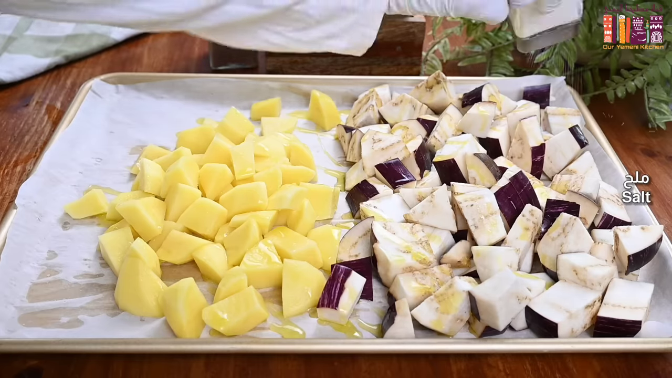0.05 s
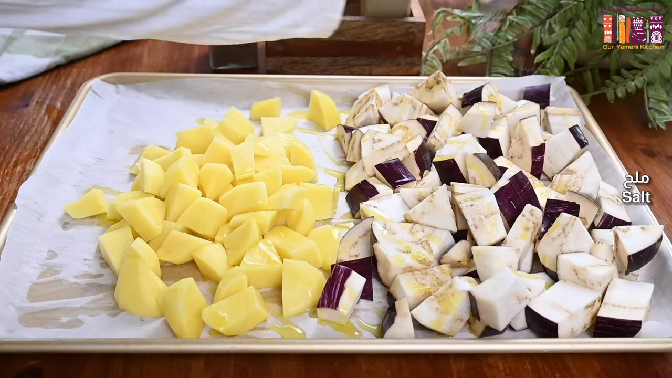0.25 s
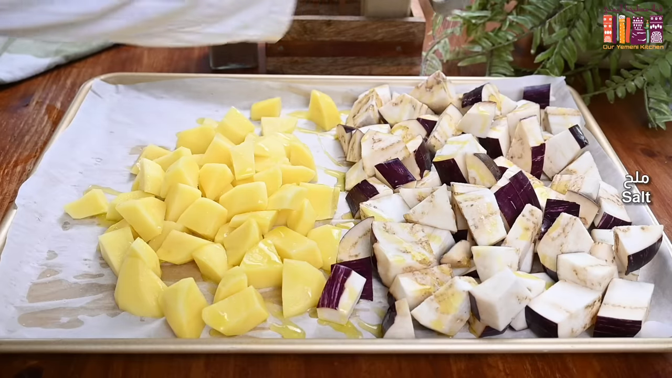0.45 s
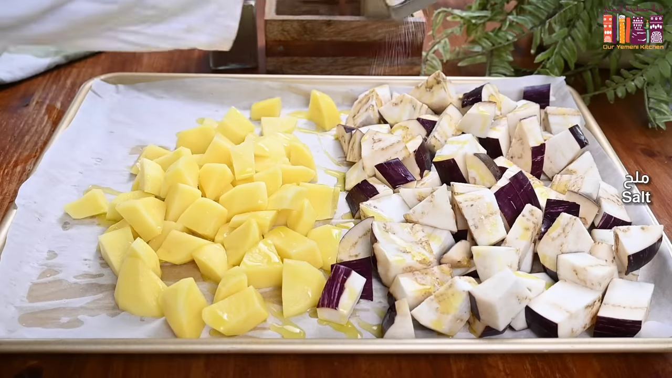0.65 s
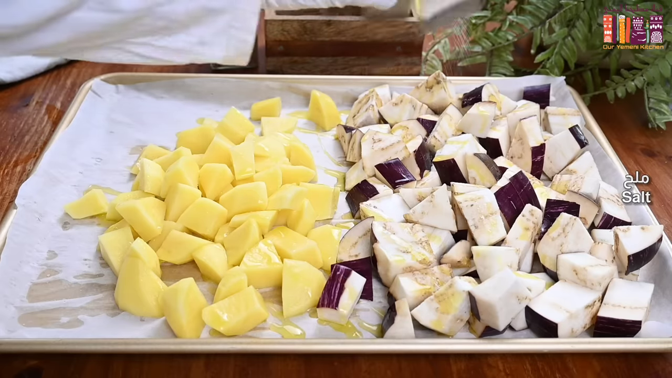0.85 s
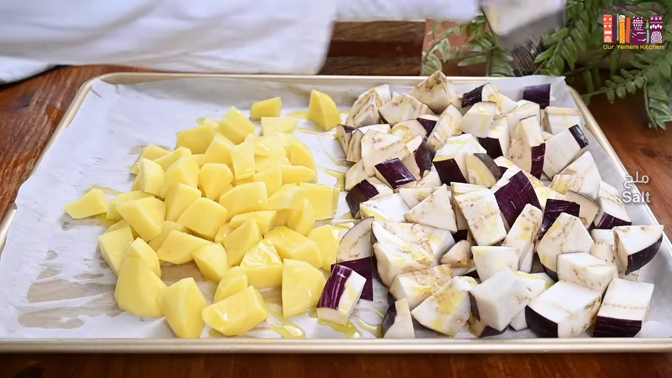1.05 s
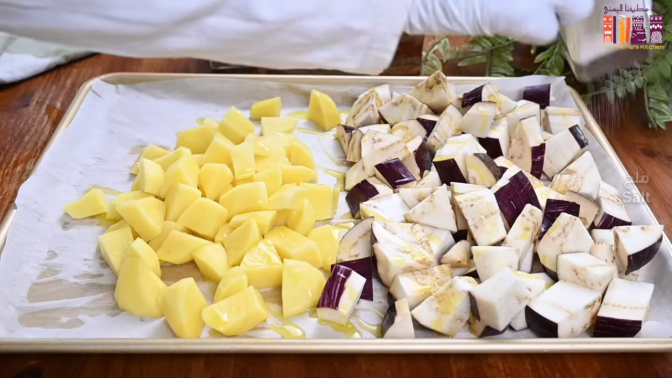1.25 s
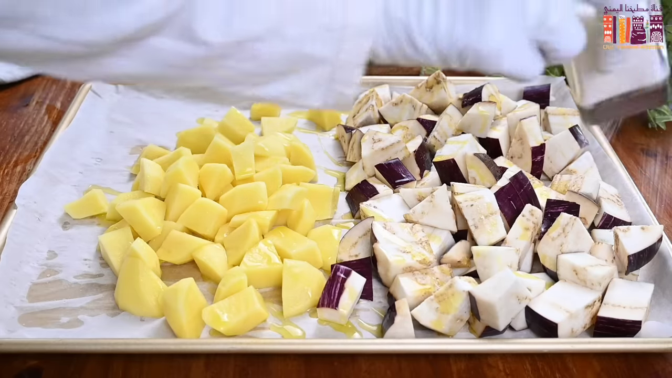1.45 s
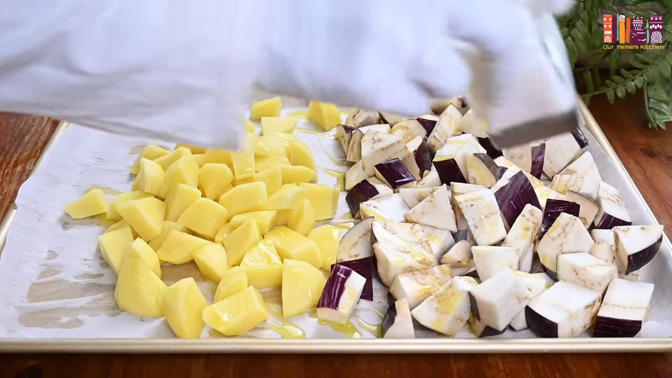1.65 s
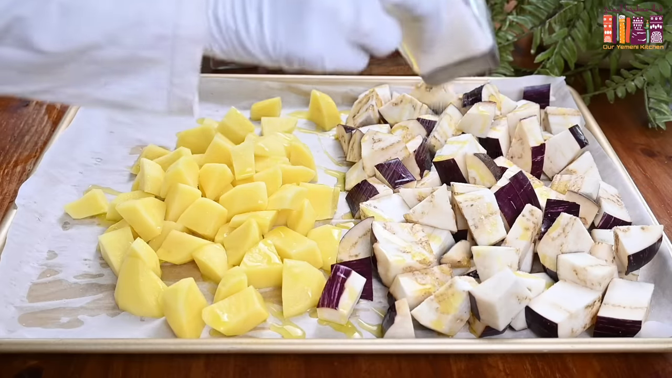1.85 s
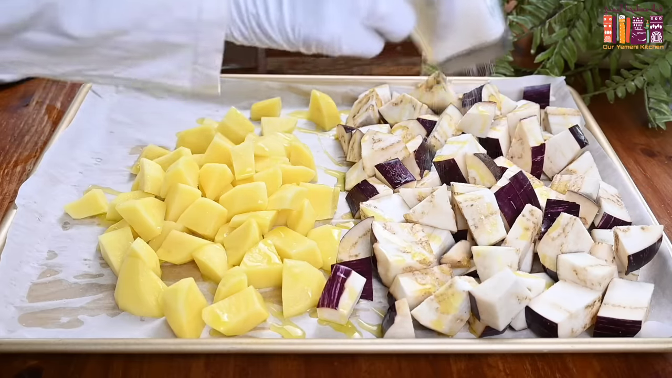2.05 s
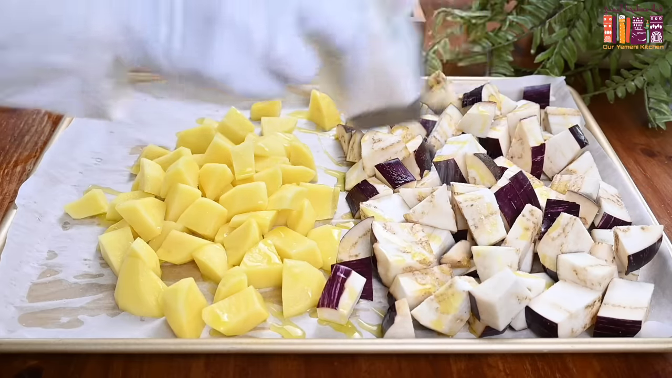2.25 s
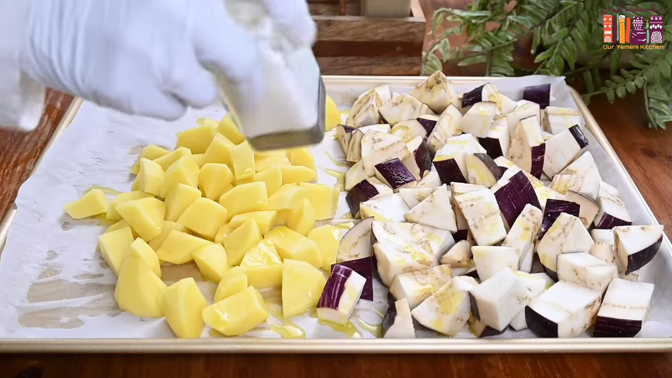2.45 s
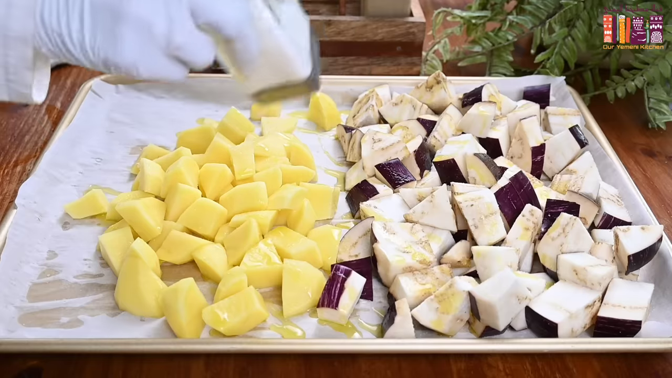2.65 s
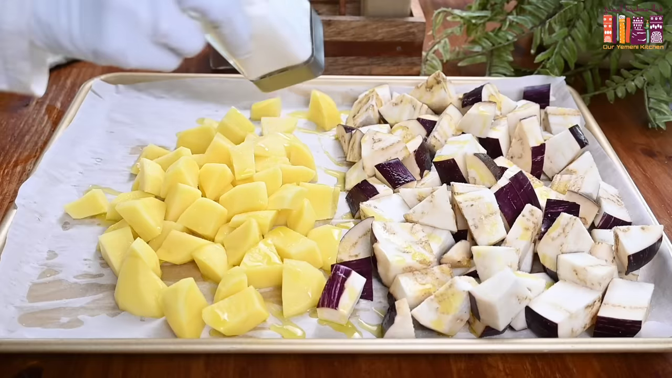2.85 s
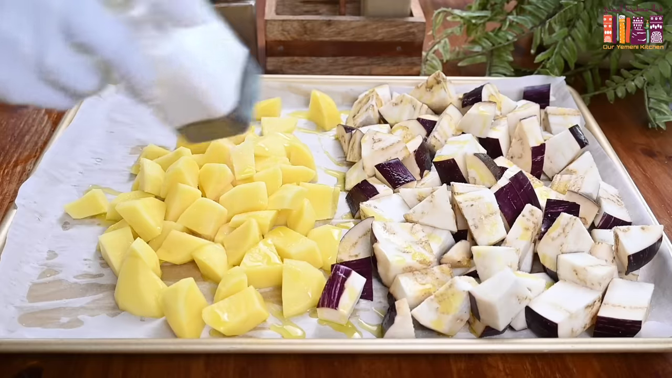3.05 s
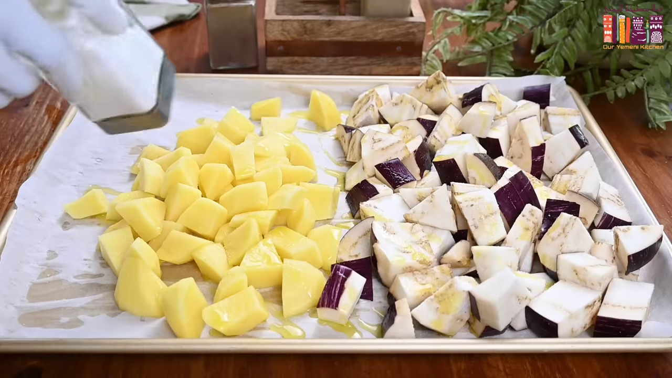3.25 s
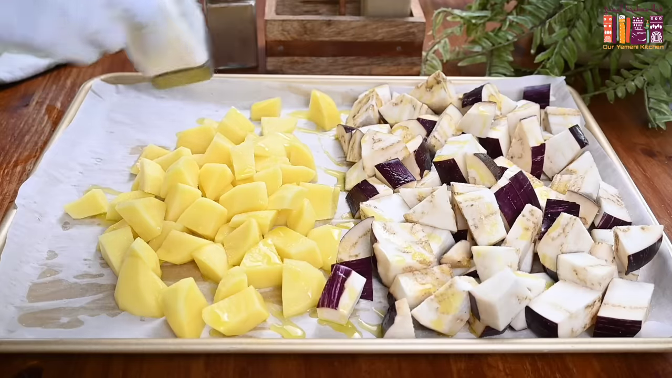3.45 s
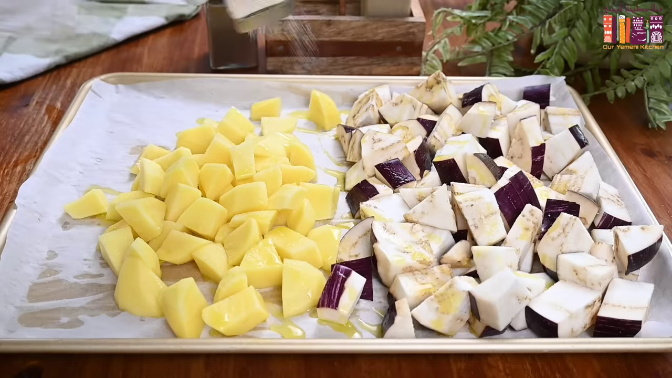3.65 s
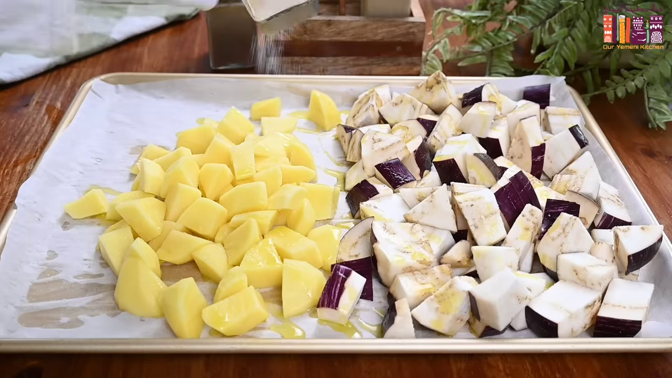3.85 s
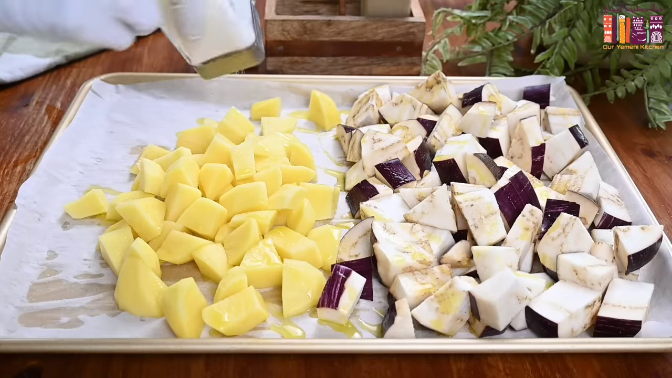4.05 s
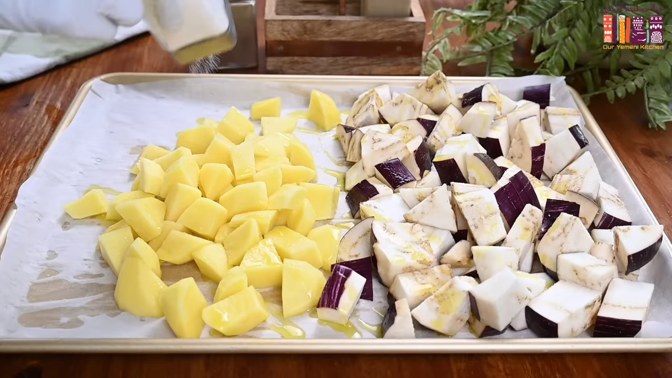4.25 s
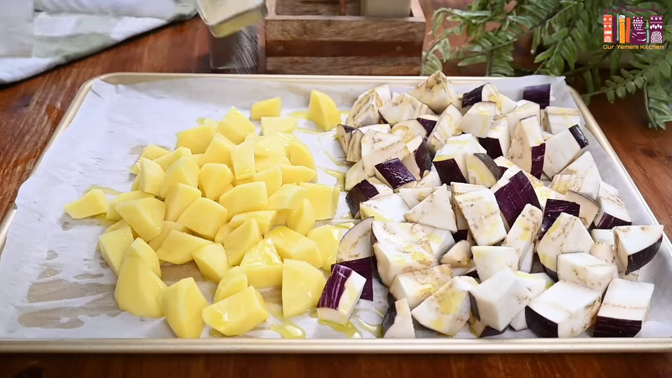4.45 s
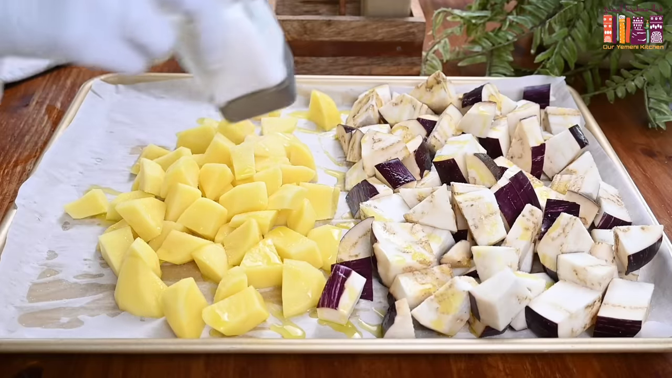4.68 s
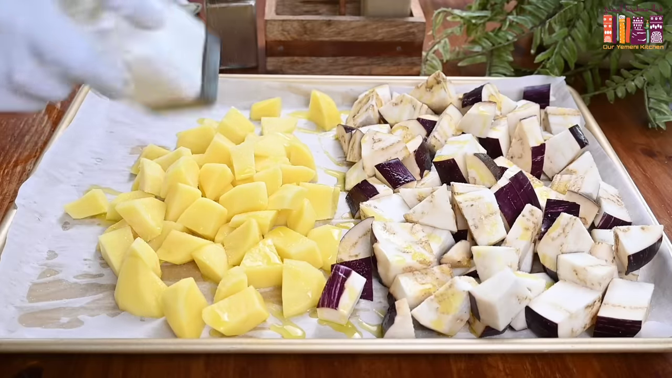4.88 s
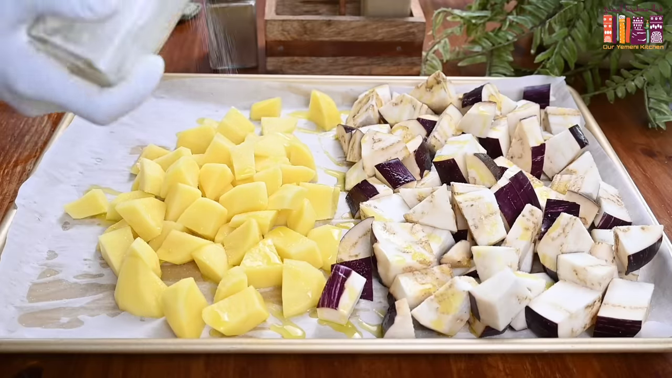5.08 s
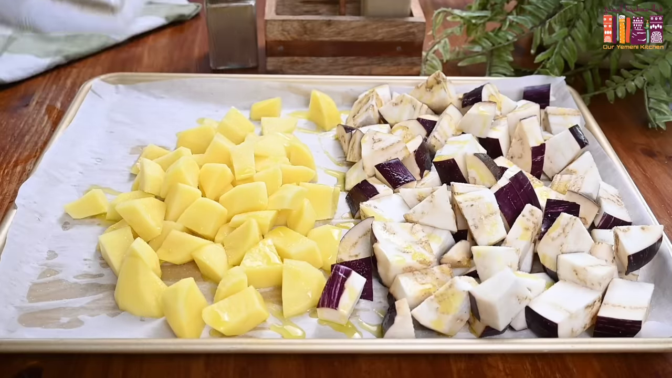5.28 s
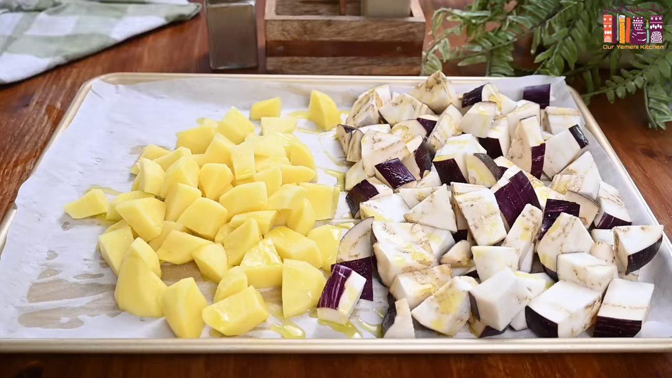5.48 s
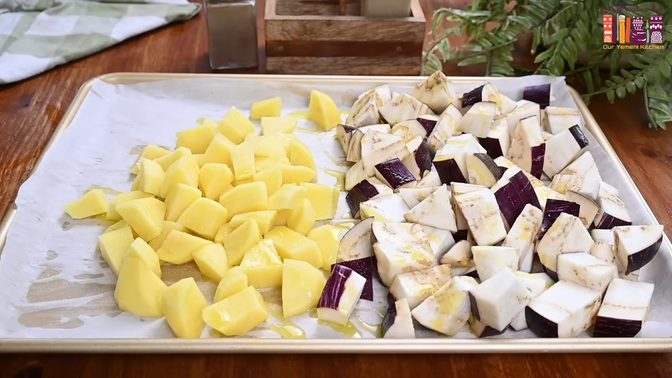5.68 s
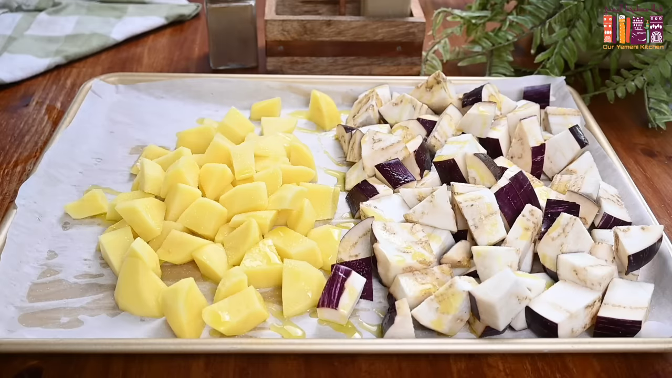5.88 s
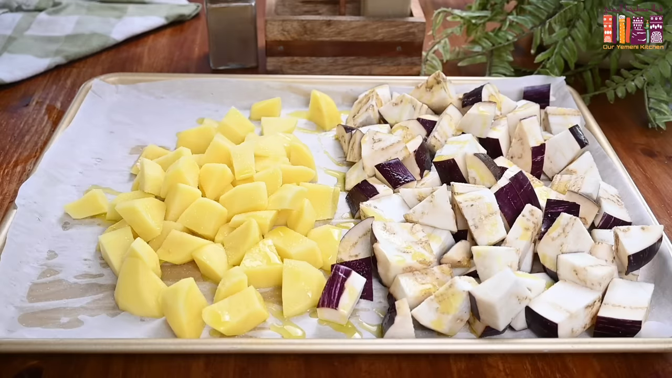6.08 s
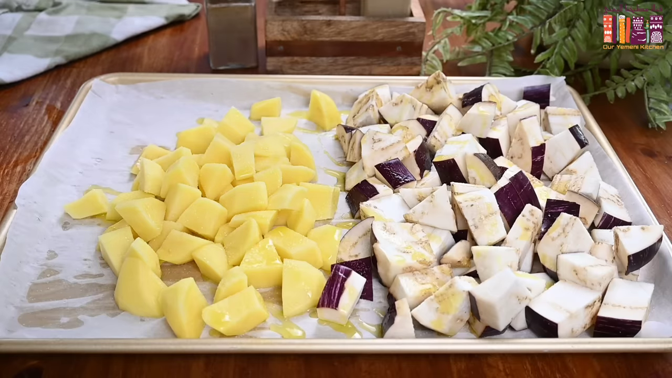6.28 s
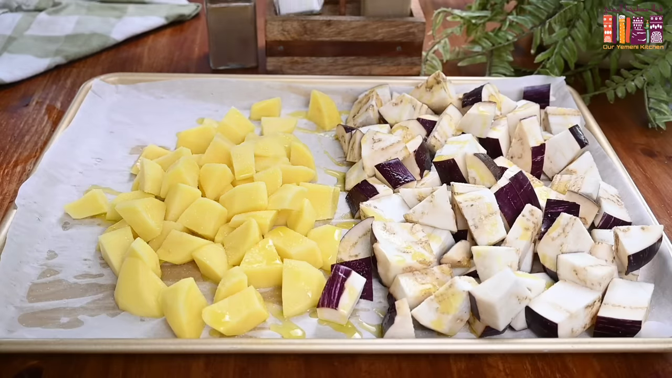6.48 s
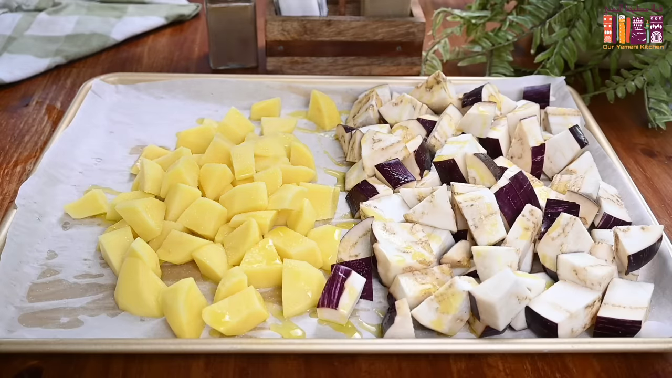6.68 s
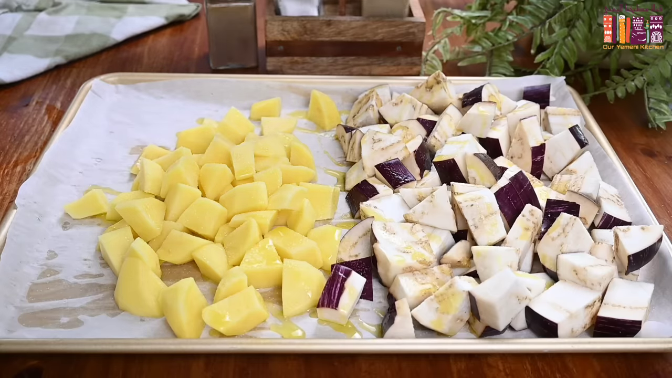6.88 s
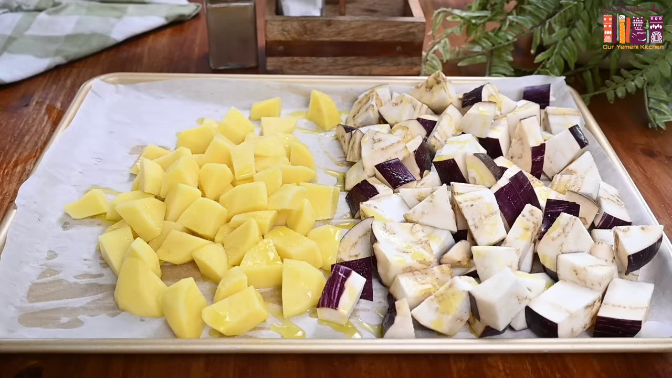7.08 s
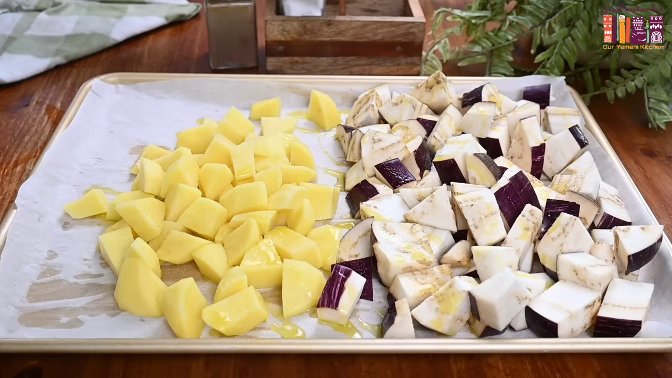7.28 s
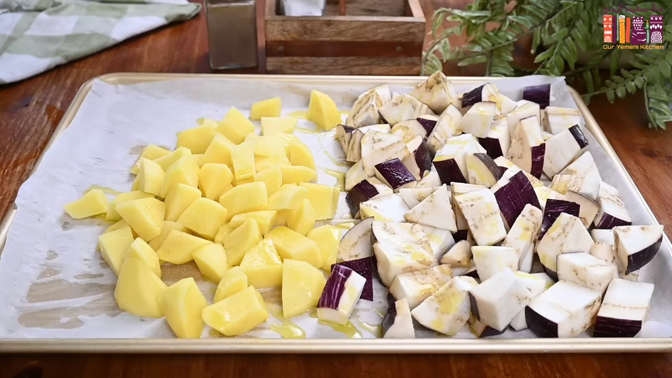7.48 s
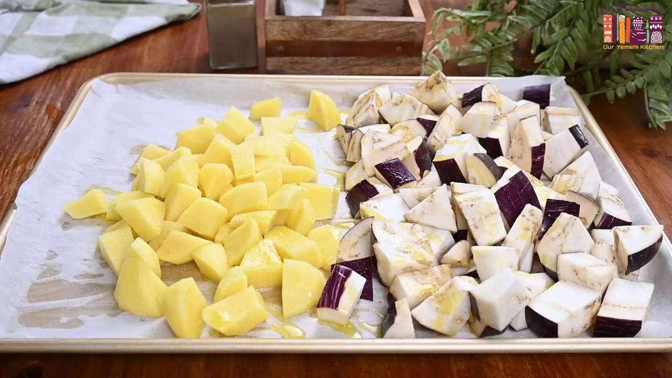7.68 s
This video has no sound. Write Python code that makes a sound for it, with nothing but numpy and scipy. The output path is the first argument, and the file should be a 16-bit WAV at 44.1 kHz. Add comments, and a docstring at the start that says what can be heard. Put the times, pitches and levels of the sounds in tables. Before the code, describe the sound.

Close, bright sprinkling of fine salt in irregular shakes, a few tiny clicks, then the shaker is set down on a wooden table in a quiet kitchen.

```python
"""Salting vegetables

Salt is shaken from a glass shaker over diced vegetables on a paper-lined tray, close by in a quiet kitchen.
Quick flicks and slower tilts send out grains, built from many tiny random clicks, that hiss and patter on paper.
Crisp ticks, made of short rings and noise, sound during the later shakes and after them. The shaker is put down
on the wooden table and a second thing knocks and settles: each blow is a sum of fading tones with noise.
A fan drones in filtered noise."""
import sys
import numpy as np
from scipy import signal
from scipy.fft import rfft, irfft
from scipy.io import wavfile
from scipy.ndimage import uniform_filter1d

SR = 44100
rng = np.random.default_rng(int(sys.argv[2]) if len(sys.argv) > 2 else 0)


def dump_mix(stems):
    """Bounce the given channels to the path in sys.argv[1] as a 16-bit WAV at rate SR."""
    frames = np.atleast_2d(stems).T  # one column per channel
    limited = np.clip(frames, -1, 1)  # hard clip at full scale
    pcm = np.round(limited * 32767).astype(np.int16)
    wavfile.write(sys.argv[1], SR, pcm)


N = 340893
TIME = np.arange(N) / SR


def undb(db):
    """Turn decibels into a gain."""
    return 10 ** (np.asarray(db) / 20)


def unit(x):
    """Scale a sound to an rms of 1."""
    return x / np.sqrt(np.mean(x ** 2))


def curve(rows, axis=1):
    """Gain over time, read from a dB column of a table."""
    rows = np.array(rows)
    return undb(np.interp(TIME, rows[:, 0], rows[:, axis]))


def add(track, s, sound):
    """Mix a sound into a track at time s."""
    i = int(s * SR)
    track[i:i + len(sound)] += sound[:N - i]


def fade(t, t60):
    """Decay that loses 60 dB in t60 seconds."""
    return np.exp(-np.log(1000) * t / t60)


def ring(x, response):
    """Let every sample of x set off the given response."""
    return signal.fftconvolve(x, response)[:len(x)]


def colour(x, points, size=4096):
    """Filter that follows (pitch [Hz], level [dB]) points and never sounds ahead of its input."""
    hz, db = np.transpose(points)
    grid = np.maximum(np.arange(size // 2 + 1) * SR / size, 1)
    wanted_db = np.interp(np.log(grid), np.log(hz), db)
    # folding the cepstrum forward gives the minimum-phase filter
    cepstrum = irfft(np.log(undb(wanted_db)))
    cepstrum[1:size // 2] *= 2
    cepstrum[size // 2 + 1:] = 0
    return ring(x, irfft(np.exp(rfft(cepstrum))))


def band_noise(hz, width):
    """Noise limited to one band around hz, rms 1."""
    middle = np.hypot(hz, width / 2)
    edges = [middle - width / 2, middle + width / 2]
    band = signal.butter(2, edges, "band", fs=SR, output="sos")
    return unit(signal.sosfilt(band, rng.standard_normal(N)))


def walk(per_s):
    """Slow random wander with a spread near 1."""
    size = int(SR / per_s)
    steps = np.repeat(rng.standard_normal(N // size + 1), size)
    smooth = uniform_filter1d(uniform_filter1d(steps, size), size)
    return 1.29 * smooth[:N]


# tone of the room air: (pitch [Hz], relative level per Hz [dB])
AIR_COLOUR = [(20, -11.5), (35, -5.5), (65, 4.5), (95, -0.5), (135, -3.5), (200, -6), (290, -6),
              (370, -11.5), (600, -14.5), (1150, -11), (1600, -13.5), (1950, -21), (3000, -21.5),
              (7000, -31.5)]


def room_air():
    """Steady noise, shaped like the hush of the room."""
    return undb(-67.5) * unit(colour(rng.standard_normal(N), AIR_COLOUR))


# bands of the distant fan: (pitch [Hz], width [Hz], level [dB])
FAN_BANDS = [(62.6, 13, -78.5), (170.4, 10, -78), (216.2, 9.2, -78), (288.3, 18.3, -81.5)]


def fan():
    """A distant fan: narrow bands of noise drone under one thin whine that wavers slightly."""
    drone = sum(undb(db) * band_noise(hz, width) for hz, width, db in FAN_BANDS)
    whine_hz = 990 + 4 * walk(per_s=12)
    whine = unit(np.sin(2 * np.pi * np.cumsum(whine_hz) / SR))
    return drone + undb(-84.5) * whine


# dull rumble of moving about: (time [s], level [dB])
RUMBLE = [(0, -59), (.22, -78), (.38, -56), (.52, -73), (1.2, -71.5), (6.3, -80), (7.3, -69), (7.45, -66.5),
          (7.73, -61.5)]


def rumble():
    """Moving about makes low noise that swells and sinks."""
    return curve(RUMBLE) * band_noise(80, 70)


# thin trickle between the strokes, before its trims: (time [s], fine spray [dB], patter [dB])
TRICKLE = [(0.0, -69, -72), (0.3, -62, -64), (0.65, -77, -75.5), (0.98, -66, -70), (1.21, -68, -72),
           (1.65, -62, -64.5), (2.35, -67.5, -75.5), (2.63, -65, -70.5), (3.54, -63.5, -66),
           (3.95, -57.5, -62.5), (4.26, -68.5, -70.5), (4.7, -52.5, -56), (4.86, -53, -65.5),
           (5.12, -65, -68), (5.93, -84.5, -82.5), (6.3, -78, -75)]
WINDUP_S, WINDUP_DB = 0.05, -4.5  # the trickle thins while the hand draws back for a flick


def trickle_power(axis, trim_db):
    """Power of the thin salt stream, which falters before each flick and stops at the table's end."""
    half_s = WINDUP_S / 2
    dips = [np.exp(-((TIME - s + half_s) / half_s) ** 2) for s, *_ in THROWS]
    running = undb(WINDUP_DB * np.max(dips, axis=0)) * (TIME < TRICKLE[-1][0])
    return (running * curve(TRICKLE, axis=axis) * undb(trim_db)) ** 2


ATTACK_S, FIRST_SHARE = 0.004, 0.27  # a quick start, toward this share of the full flow
LATE_SHARE, LATE_S = 0.09, 0.077  # stragglers: share of the stroke's power, and time to fall to 37 %


def stroke(swell_s, fall_s):
    """Power of one stroke: it swells as grains leave the cap and dies away; stragglers land late."""
    t = TIME[:SR // 2]
    start = np.minimum(t / ATTACK_S, 1)
    swell = np.minimum(FIRST_SHARE + (1 - FIRST_SHARE) * t / swell_s, 1)
    flow = start * swell * np.exp(-2 * np.maximum(t - swell_s, 0) / fall_s)
    late = np.exp(-t / LATE_S)
    return flow + LATE_SHARE * np.abs(ring(flow, late / late.sum()))


# flicks of the wrist that throw a burst of salt:
# (time [s], fine spray [dB], patter relative to spray [dB], cap ring relative to spray [dB])
THROWS = [(0.732, -46, -8, -14), (0.913, -56, -4.5, -5), (1.01, -70, -18, -6), (1.295, -56.5, -1, -14),
          (1.942, -57, -1.5, 2.5), (1.962, -57.5, -1, 3), (2.303, -56, -4, -1), (2.452, -51.5, -4.5, -0.5),
          (2.604, -56.5, -6.5, -13), (3.125, -53, -4.5, -12), (3.185, -58.5, -8.5, -8), (3.4, -60, 0, 0),
          (3.472, -47, -3.5, -6), (3.57, -61, 3.5, -11), (3.651, -52.5, -5.5, -4), (3.833, -46.5, -6, -5),
          (4.522, -46.5, -3.5, -7), (4.596, -54, -3, -0.5), (4.772, -56.5, 3.5, 0.5),
          (4.838, -50.5, -5.5, -8)]
THROW_SWELL_S, THROW_FALL_S = 0.014, 0.026  # a throw peaks quickly and dies away
# tilts in which the salt slides, gathers and stops short:
# (time [s], length [s], fine spray [dB], patter relative to spray [dB], cap relative to spray [dB])
SLIDES = [(0.039, 0.055, -58.5, 1, -8), (0.186, 0.088, -57.5, -2, -7), (0.39, 0.19, -72, 3, -7),
          (1.222, 0.055, -61.5, -7.5, -12), (1.424, 0.059, -61.5, 0.5, -2),
          (1.56, 0.083, -55.5, -4.5, -6.5), (1.725, 0.077, -56.5, -4, -10), (2.507, 0.061, -59, -2.5, -1.5),
          (2.689, 0.12, -55.5, -3.5, 0), (2.895, 0.095, -51, -9, -8), (3.068, 0.031, -58, -2.5, 0.5),
          (3.268, 0.067, -51, -6, -3.5), (3.733, 0.072, -54.5, -5, -6), (3.879, 0.038, -54, -6, -7),
          (3.991, 0.017, -50, -2.5, -1), (4.102, 0.066, -57, -3, 1), (4.238, 0.0047, -57.5, 2, 2.5),
          (4.356, 0.024, -53, 0, -1), (4.687, 0.016, -54.5, 2, 3), (4.973, 0.016, -49.5, -6.5, -6),
          (5.283, 0.052, -65, 0.5, -0.5)]
SLIDE_FALL_S = 0.013  # a slide stops short


def salt_flow():
    """Strength of spray, patter and cap: the powers of trickle, throws and slides add up."""
    spray = trickle_power(axis=1, trim_db=-4)
    patter = trickle_power(axis=2, trim_db=-1.5)
    cap = trickle_power(axis=1, trim_db=-9)
    strokes = [(s, stroke(THROW_SWELL_S, THROW_FALL_S), *levels) for s, *levels in THROWS]
    strokes += [(s, stroke(length, SLIDE_FALL_S), *levels) for s, length, *levels in SLIDES]
    for s, power, db, patter_db, cap_db in strokes:
        add(spray, s, power * undb(db) ** 2)
        add(patter, s, power * undb(db + patter_db) ** 2)
        add(cap, s, power * undb(db + cap_db) ** 2)
    return np.sqrt(spray), np.sqrt(patter), np.sqrt(cap)


def grains(flow, points, per_s, spread_db, scatter, scatter_s):
    """Single grain hits, denser when more salt flows; each leaves a brief rustle as it skitters away."""
    rate = per_s * np.clip(flow / undb(-57), .12, 4)  # per_s holds at a flow of -57 dB
    sizes = undb(spread_db * np.clip(rng.standard_normal(N), -2, 2.2))
    # dividing by the root of the rate leaves the loudness to the flow
    hits = unit((rng.random(N) < rate / SR) * sizes / np.sqrt(rate))
    skitter = np.exp(-TIME[:SR // 20] / scatter_s)
    rustle_level = np.sqrt(np.abs(ring(hits ** 2, skitter / skitter.sum())))
    rustle = rustle_level * rng.standard_normal(N)
    clicks = hits * rng.choice([-1, 1], N)
    return flow * unit(colour(clicks + scatter * rustle, points))


def pings(flow, count=1100, ring_t60=.005, spread_db=1.0):
    """Coarser crystals strike one by one, each a short tone with a pitch of its own."""
    out, t = np.zeros(N), TIME[:SR // 100]
    for when, pitch, size in rng.random((count, 3)):
        hz = 3800 * 3.8 ** pitch
        ping = np.sin(2 * np.pi * hz * t) * fade(t, ring_t60)
        add(out, when * TIME[-1], undb(-spread_db * np.log(max(size, .03))) * ping)
    return flow * unit(out)


def bounce(x, lag_s, share):
    """An echo off a near surface; its path wanders with the hand and so shifts the colour."""
    lag = lag_s * np.exp(0.33 * walk(per_s=7))
    echo = np.interp(TIME - lag, TIME, x)
    return (x + share * echo) / np.hypot(1, share)


# tones of the fine spray, the shaker's cap and the patter on paper: (pitch [Hz], relative level [dB])
SPRAY_COLOUR = [(2000, -32), (4500, -53), (6500, -20.5), (8000, 2.5), (10000, 3.5), (12500, 5),
                (15500, 2.5)]
CAP_COLOUR = [(4000, -36), (6600, -11.5), (7400, -5.5), (7950, -3), (8600, -5.5), (9800, -10), (15000, -24)]
PATTER_COLOUR = [(500, -20.5), (1500, -16), (2400, -7), (3300, -4), (4200, -1), (5400, 1.5), (6800, -3),
                 (9000, -13.5), (13000, -22.5)]


def salt():
    """Bright spray, metal cap ringing under the grains, duller patter on paper; only spray has width."""
    spray, patter, cap = salt_flow()
    fine = undb(2.0) * grains(spray, SPRAY_COLOUR, per_s=1900, spread_db=6.5, scatter=0.81, scatter_s=0.0015)
    metal = undb(1.5) * grains(cap, CAP_COLOUR, per_s=4900, spread_db=9.0, scatter=0.6, scatter_s=0.00076)
    paper = undb(0.48) * grains(patter, PATTER_COLOUR, per_s=2400, spread_db=4.0, scatter=0.67,
                                scatter_s=0.0029)
    coarse = undb(-10) * pings(np.sqrt(spray * patter))
    side = undb(-10.0) * grains(spray, SPRAY_COLOUR, per_s=4000, spread_db=4.0, scatter=1.5, scatter_s=0.0053)
    fine = bounce(fine, lag_s=0.000398, share=0.39)
    paper = bounce(paper, lag_s=0.000489, share=0.37)
    return fine + metal + paper + coarse, side


# crisp ticks as the shaker is handled: (time [s], peak level [dB], ring pitch [Hz])
TICKS = [(4.007, -32.5, 5500), (4.055, -34.5, 5900), (4.111, -38.5, 11900), (4.161, -35, 5500),
         (4.2401, -40, 5270), (4.334, -33.5, 11800), (4.505, -33, 7450), (5.321, -37, 4130),
         (5.3543, -33.5, 2960), (5.411, -49, 8200), (5.485, -45, 5400), (5.545, -33, 5730),
         (5.607, -39, 4800), (5.617, -29, 4800), (5.631, -34, 5330), (5.639, -30.5, 3900),
         (6.045, -34, 3230), (6.129, -36.5, 5000), (6.148, -35, 8100), (6.528, -49, 5440)]
# tone of the ring and crack: (pitch [Hz], relative level [dB])
TICK_COLOUR = [(1000, -20), (2200, -7), (3300, -3.5), (5500, 0), (8000, -3.5), (11000, -8), (15500, -16)]
SNAP_DB = -1.5  # bright snap, mixed in beside the ring
RATTLE_DB, RATTLE_S = -14.5, 0.014  # a tick is followed by a weaker one, about this much later


def ticks(ring_t60=0.0034, crack_t60=0.015, crack=0.34, snap_t60=0.0017):
    """Tiny hard contacts: a bright snap, a noisy crack and a very short ring; each rattles once more."""
    out, t = np.zeros(N), TIME[:SR // 40]
    treble = signal.butter(2, 4000, "high", fs=SR, output="sos")
    for s, db, hz in TICKS:
        rattle_lag_s = RATTLE_S * (.5 + rng.random())
        for lag_s, drop_db in ((0, 0), (rattle_lag_s, RATTLE_DB)):
            noise = rng.standard_normal((2, len(t)))
            tone = np.sin(2 * np.pi * hz * t) * fade(t, ring_t60)
            rough = crack * noise[0] * fade(t, crack_t60)
            snap = signal.sosfilt(treble, noise[1] * fade(t, snap_t60))
            tick = colour(tone + rough, TICK_COLOUR) + undb(SNAP_DB) * snap
            add(out, s + lag_s, undb(db + drop_db) * tick / np.abs(tick).max())
    return out


# faint thin chirps: (time [s], length [s], pitch [Hz], fall over the chirp [share of pitch], level [dB])
CHIRPS = [(5.407, 0.037, 6670, 0.02, -59), (5.497, 0.036, 6650, 0.01, -60),
          (6.819, 0.045, 3400, 0.04, -74.5), (6.926, 0.071, 3640, 0.13, -77)]
CHIRP_DROOP = 0.05  # share of the pitch lost at both ends


def chirps():
    """Short arched whistles: sine tones whose pitch bends down at both ends and sinks a little."""
    out = np.zeros(N)
    for s, length, hz, fall, db in CHIRPS:
        u = np.linspace(-1, 1, int(length * SR))
        pitch = hz * (1 - CHIRP_DROOP * u ** 4 - fall * u / 2)
        whistle = np.sin(2 * np.pi * np.cumsum(pitch) / SR)
        add(out, s, undb(db) * whistle * signal.windows.tukey(len(u), .6))
    return out


# blows on the table: (time [s], level [dB], contact hardness [Hz], deep thud relative to blow [dB],
# glass click relative to blow [dB], note of the striking thing [Hz])
KNOCKS = [(6.4421, -14.5, 1210, -8.5, -9, 570), (6.449, -27.5, 2800, -23, -10, 1064),
          (6.486, -40.5, 4200, -12, -15, 1650), (6.5984, -35, 885, -27, -34, 375),
          (6.792, -46, 590, -25, -13, 316), (6.863, -54, 1800, -20, 2, 1260),
          (6.894, -40.5, 790, -27, -17, 543), (6.956, -49.5, 600, -28, -28, 342),
          (6.995, -39, 1500, 13.5, 5, 300), (7.015, -33, 3600, -34, -1.5, 1276),
          (7.0177, -25, 1670, -17, -25, 572), (7.097, -48.5, 900, -19, -15, 1330),
          (7.177, -48.5, 600, -6.5, -27, 398), (7.404, -52.5, 444, 3.5, 0, 218),
          (7.519, -53, 2800, -19, -21, 1290), (7.665, -66, 2500, -10, -10, 2660)]
# ringing tones of the wooden table with the tray on it: (pitch [Hz], level [dB], time to lose 60 dB [s])
TABLE_MODES = [(135.4, -27, 0.26), (167, -17, 0.14), (233.5, -17.5, 0.096), (292, -12.5, 0.074),
               (392, -12.5, 0.14), (467, -9.5, 0.044), (532, -10, 0.055), (610, -9, 0.071),
               (710, -13.5, 0.041), (930, -9, 0.031), (1100, -8, 0.028), (1168, -5.5, 0.023),
               (1304, -17, 0.066), (1615, -20, 0.054), (1840, -22.5, .08), (1950, -19, 0.073),
               (2020, -14, 0.061), (2668, -15, 0.047), (3100, -33, .05), (3560, -16.5, 0.037)]
# tone of the glass click: (pitch [Hz], relative level [dB])
GLASS_COLOUR = [(1500, -21), (3400, -3), (4100, -7.5), (5300, -3.5), (6000, -10), (6800, -3.5), (8300, -10),
                (10500, -28), (15000, -33)]
THUD_HZ, THUD_T60_S = 149, 0.084
NOTE_DB = 4.5  # the striker's note relative to the blow


def knocks(grain_db=-11, grain_t60=0.16, click_t60=0.028, note_t60=0.027, place_db=1.5):
    """Blows ring the table; softer contacts pass less treble; thud, glass click and striker's note join."""
    out, t = np.zeros(N), TIME[:SR // 2]
    modes = np.array([(-1) ** k * undb(db) * np.sin(2 * np.pi * hz * t) * fade(t, t60)
                      for k, (hz, db, t60) in enumerate(TABLE_MODES)])
    thud = -np.sin(2 * np.pi * THUD_HZ * t) * fade(t, THUD_T60_S) * (1 - np.exp(-t / 0.0023))
    for s, db, hard_hz, thud_db, click_db, note_hz in KNOCKS:
        noise = rng.standard_normal((2, len(t)))
        # each spot of the table favours other modes
        wood = undb(place_db * rng.standard_normal(len(modes))) @ modes
        # noise stands for the countless weak modes between the strong ones
        body = wood + undb(grain_db) * noise[0] * fade(t, grain_t60)
        softness = signal.butter(2, min(hard_hz, SR / 4), fs=SR, output="sos")
        body = signal.sosfilt(softness, body)
        click = colour(noise[1] * fade(t, click_t60) * (1 - np.exp(-t / 0.00079)), GLASS_COLOUR)
        note = np.sin(2 * np.pi * note_hz * t) * fade(t, note_t60) * (1 - np.exp(-t * note_hz * 2))
        blow = body / np.abs(body).max() + undb(thud_db) * thud
        blow = blow + undb(click_db) * click + undb(NOTE_DB) * note
        add(out, s, undb(db) * blow)
    # the table is too small to radiate deep bass
    return signal.sosfilt(signal.butter(2, 60, "high", fs=SR, output="sos"), out)


# soft brushing as the hand withdraws: (time [s], level [dB])
BRUSH = [(7.28, -100), (7.36, -79), (7.43, -68.5), (7.49, -94), (7.66, -100), (7.73, -84)]


def brush():
    """The withdrawing hand brushes softly: a wide band of noise that comes and goes."""
    return curve(BRUSH) * band_noise(3800, 3700)


# tone of the kitchen's echo: (pitch [Hz], relative level [dB])
ROOM_COLOUR = [(80, -17.5), (200, 6.5), (500, 3), (1200, 0.5), (3000, -3.5), (8000, -7), (15000, -10.5)]


def kitchen(x, t60, build_s):
    """Blurred echo of a small room: a burst of noise that builds up, then fades."""
    t = TIME[:SR // 2]
    tail = rng.standard_normal(len(t)) * fade(t, t60) * (1 - np.exp(-(t / build_s) ** 2))
    return ring(x, colour(tail / np.linalg.norm(tail), ROOM_COLOUR))


def scene():
    """Everything sits in the centre with a little room echo; the side signal adds slight width."""
    background = room_air() + fan() + rumble() + brush()
    sprinkle, side = salt()
    small = ticks() + chirps()
    blows = knocks()
    mid = sprinkle + small + blows + background
    mid = mid + kitchen(undb(-6) * sprinkle + undb(-5.5) * small, t60=.22, build_s=0.0026)
    mid = mid + undb(-12.5) * kitchen(blows, t60=0.28, build_s=0.0045)
    side = side + undb(-85) * rng.standard_normal(N)  # faint microphone hiss
    return np.array([mid + side, mid - side])


def record(dry):
    """The top is cut steeply above 15800 Hz."""
    return signal.sosfilt(signal.ellip(10, .2, 70, 15800, fs=SR, output="sos"), dry)


dry = scene()
out = record(dry)
dump_mix(out)
```